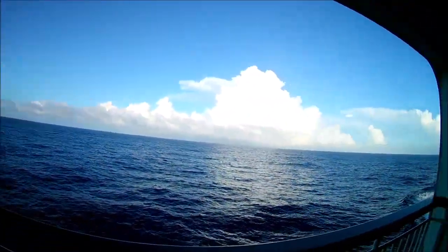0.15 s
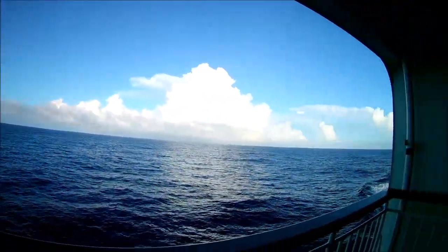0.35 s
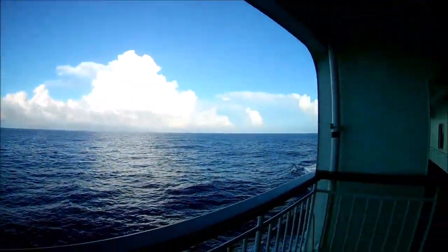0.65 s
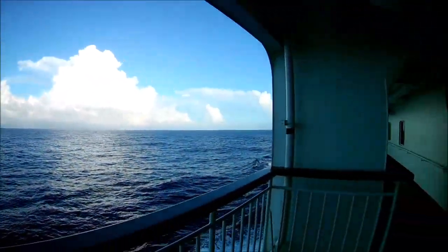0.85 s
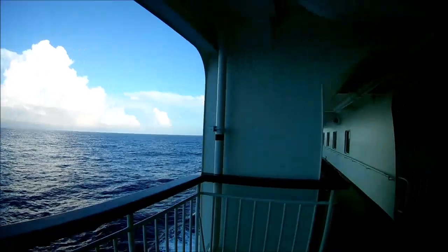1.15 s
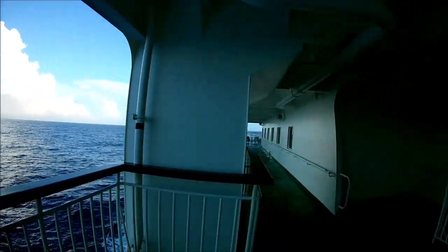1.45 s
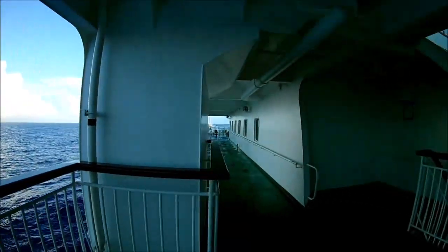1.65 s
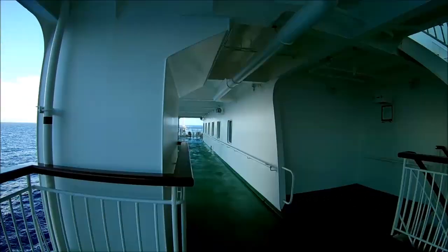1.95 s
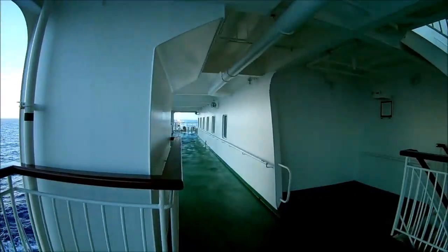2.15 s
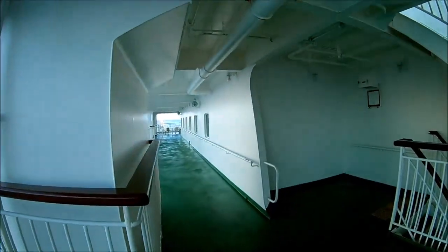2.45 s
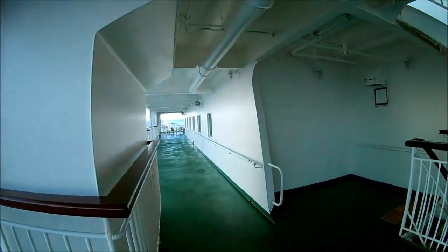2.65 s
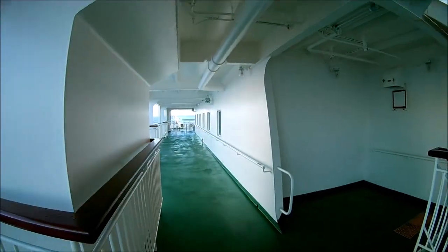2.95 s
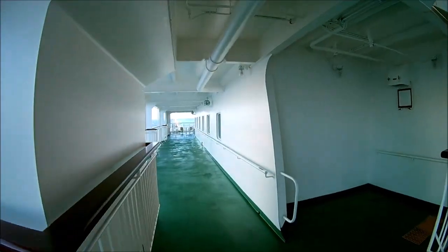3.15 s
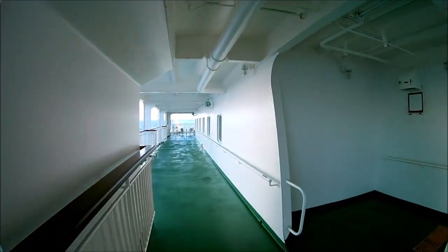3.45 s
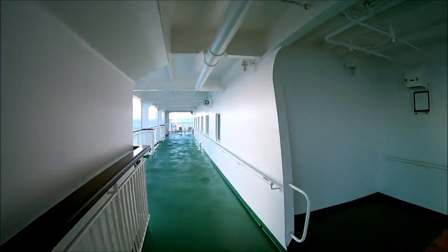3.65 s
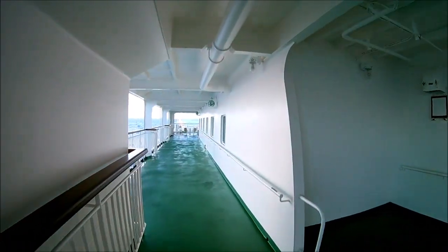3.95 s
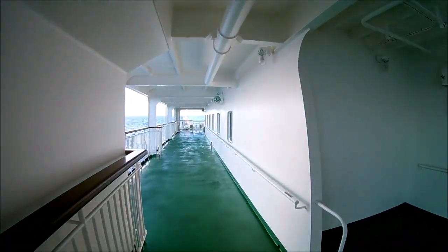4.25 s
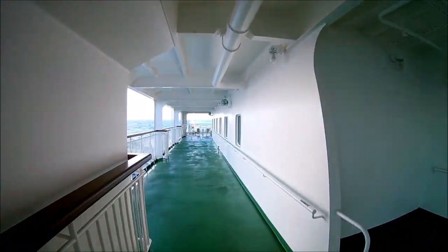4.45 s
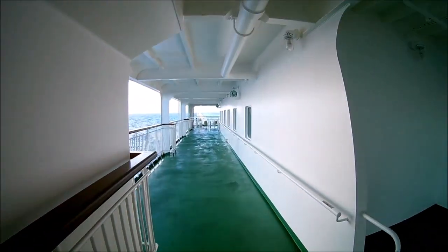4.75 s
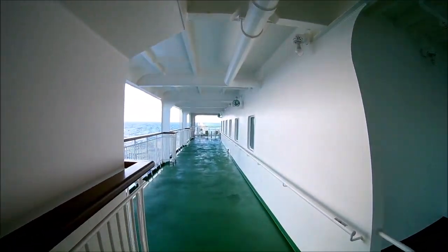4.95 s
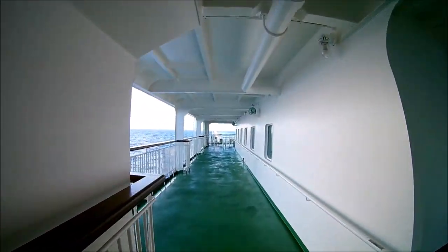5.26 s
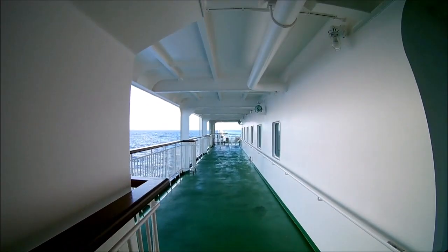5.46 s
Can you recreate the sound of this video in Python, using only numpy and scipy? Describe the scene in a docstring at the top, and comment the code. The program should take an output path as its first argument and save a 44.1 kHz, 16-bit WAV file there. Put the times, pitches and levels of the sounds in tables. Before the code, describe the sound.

A ship's engine drones low and throbbing on a covered deck while the sea hisses past and wind thumps the microphone.

```python
"""On the covered side deck of a ship under way, the main engine throbs through the steel: a set of steady tones.
Gusts buffet the microphone as low, lumpy noise, and bursting eddies thump it with short swings.
Machinery noise rings in the deck plates, and the ventilation hums on one wavering tone and hisses in one band.
The sea, a broad shaped noise, hisses along the hull and shifts in treble as the listener turns."""
import sys
import numpy as np
from scipy import signal
from scipy.io import wavfile
from scipy.ndimage import uniform_filter1d

SR = 44100
rng = np.random.default_rng(int(sys.argv[2]) if len(sys.argv) > 2 else 0)


def log_audio(samples):
    """Write samples as a 16-bit WAV file to the path given in sys.argv[1]."""
    # one column per channel
    frames = np.atleast_2d(samples).T
    # limit to full scale, then quantise
    limited = np.clip(frames, -1, 1)
    pcm = np.round(limited * 32767).astype(np.int16)
    wavfile.write(sys.argv[1], SR, pcm)


N = 247842  # length in samples
T = np.arange(N) / SR  # time of each sample in seconds


def amp(db):
    """Turns decibels into a gain."""
    return 10 ** (np.asarray(db) / 20)


def evened(x):
    """Scales a signal to an average strength (rms) of 1."""
    return x / np.sqrt(np.mean(x ** 2) + 1e-20)


def columns(rows, t):
    """Reads every column of a curve table at the times t, with straight lines between rows."""
    s, *values = np.transpose(rows)
    return [np.interp(t, s, v) for v in values]


def slow_noise(size):
    """Random wandering: noise averaged twice over a number of samples, at rms 1."""
    once = uniform_filter1d(rng.standard_normal(N), size=size)
    return evened(uniform_filter1d(once, size=size))


def resonate(x, hz, width):
    """A steep resonance: shifts the pitch hz down to zero, smooths twice, and shifts back."""
    turn = np.exp(2j * np.pi * np.cumsum(hz * np.ones(N)) / SR)
    r = np.exp(-np.pi * width / SR)  # width in Hz of one smoothing
    once = signal.lfilter([1], [1, -r], x / turn)
    twice = signal.lfilter([1], [1, -r], once)
    return (turn * twice).real


def shaped_noise(gain, size):
    """Noise built from random short-time spectra, each weighted by gain(Hz, seconds)."""
    frames = 4 * N // size + 5
    hz = np.fft.rfftfreq(size, 1 / SR)[:, None]
    t = np.arange(frames) * size / 4 / SR
    a, b = rng.standard_normal((frames, len(hz), 2)).T
    spectra = (a + 1j * b) * gain(hz, t) / size
    return signal.istft(spectra, nperseg=size, noverlap=3 * size // 4)[1][:N] * np.sqrt(size)


def engine():
    """Tones at whole multiples (orders) of the engine cycle; neighbouring orders beat once a cycle."""
    # Each row: multiple of the cycle, level in dB before the throb is added.
    orders = [(5, -50.5), (6, -48), (7, -29), (8, -39.5), (30, -39)]
    # The eighth order swells and fades, so the throb deepens and flattens; the thirtieth comes up in the passage.
    # Each row: time in seconds, change of the eighth order in dB, change of the thirtieth in dB.
    throb = [(0, 4, -5.5), (.8, 5, -7.5), (1.3, 6, -5), (1.7, 3, -0.5), (2.15, 6, 0.5), (2.6, 0, 6),
             (3.1, -2, 1), (3.8, -7.5, -9.5), (4.4, -2, -7), (5.62, 4, -4.5)]
    # Engine speed, drifting a little. Each row: time in seconds, cycles per second in Hz.
    cycle = [(0, 4.7), (1.3, 4.697), (2.4, 4.685), (3.2, 4.68), (4, 4.676), (5.62, 4.66)]
    first_throb_s = .051  # the orders line up at about this moment
    turns = np.cumsum(columns(cycle, T)[0]) / SR - cycle[0][1] * first_throb_s
    eighth_db, thirtieth_db = columns(throb, T)
    out = np.zeros(N)
    for k, db in orders:
        level_db = db + eighth_db * (k == 8) + thirtieth_db * (k == 30)
        out += np.sqrt(2) * amp(level_db) * np.cos(2 * np.pi * k * turns)
    return out


def thumps():
    """Eddies burst on the microphone: each is a brief swing with a faint rasp, rising faster than it settles."""
    # Each row: time in seconds, level of the swing in dB, basic length in ms, swing in Hz, push 1 or pull -1.
    eddies = [(.306, -19, 2.2, 120, 1), (0.309, -9, 3.4, 120, -1), (0.329, -10.5, 1.9, 130, 1),
              (0.495, -10.5, 1.8, 130, -1), (.57, -11.5, 3.9, 90, 1), (.578, -17, 4, 280, -1),
              (.604, -13, 4.9, 80, -1), (0.614, -7, 2.5, 230, 1), (.627, -7, 2.6, 90, -1),
              (0.635, -12, 4.9, 70, 1), (.639, -18, 2.3, 330, 1), (0.644, -9, 1.4, 89, -1),
              (.656, -10, 1.9, 170, -1), (0.662, -8.5, 2.5, 141, 1), (1.302, -14, 2.4, 180, -1),
              (1.306, -15.5, 4.7, 46, 1), (1.316, -20, 7, 30, -1), (1.33, -17, 4.8, 60, 1),
              (1.371, -16, 5.7, 60, -1), (1.378, -14.5, 2, 150, -1), (1.382, -11, 3.7, 90, 1),
              (1.385, -13.5, 2.5, 330, -1), (1.388, -15, 4.6, 60, 1), (1.399, -15.5, 4, 60, -1),
              (1.498, -20, 3.5, 70, -1), (1.591, -16.5, 3.1, 171, 1), (1.615, -21, 5, 60, -1),
              (1.624, -15, 3, 120, 1), (1.648, -20, 1.7, 200, -1), (2.833, -18, 2.1, 140, -1),
              (2.962, -13.5, 3, 170, -1), (3.082, -15, 3.5, 80, -1), (3.091, -17, 2.6, 100, 1),
              (3.369, -19, 3, 170, 1), (3.5, -13, 4, 80, 1), (3.514, -17, 6.1, 60, -1),
              (3.528, -16, 4.3, 90, 1), (3.786, -15, 3.6, 70, -1), (3.851, -10.5, 2.8, 216, -1),
              (3.864, -11.5, 1.2, 200, 1), (3.872, -7, 1.7, 170, -1), (3.888, -20, 1.4, 850, 1),
              (3.893, -15, 4.1, 280, 1), (3.9, -12, 1.9, 200, 1), (3.919, -10, 7.2, 60, 1),
              (3.925, -6, 1.6, 230, 1), (3.927, -7, 3.3, 150, -1), (3.929, -20.5, 2.3, 620, 1),
              (3.909, -12, 6.5, 50, -1), (3.94, -16, 4.4, 340, 1), (3.941, -11, 4.9, 45, -1),
              (3.954, -6, 2.1, 88, 1), (3.965, -4.5, 2.3, 98, -1), (3.992, -11.5, 2.2, 450, 1),
              (4.063, -6.5, 2.3, 130, 1), (4.066, -20.5, 1.5, 600, 1), (4.068, -6.5, 3.2, 109, -1),
              (4.082, -12, 3, 110, -1), (4.118, -14, 1.4, 200, -1), (4.121, -12.5, 5.6, 160, 1),
              (4.129, -16, 2.5, 160, 1), (4.142, -11, 3, 139, 1), (4.171, -13, 5, 100, -1),
              (4.179, -9.5, 2.8, 110, 1), (4.202, -3.5, 2.2, 120, 1), (4.204, -13, 2.6, 410, 1),
              (4.21, -14.5, 3, 520, -1), (4.212, -4, 2.9, 87, -1), (4.219, -14, 2.5, 90, 1),
              (4.445, -15, 4, 70, 1), (4.523, -16.5, 3, 180, -1), (4.736, -16, 3, 130, -1),
              (4.948, -22, 2.5, 150, -1), (5.122, -17.5, 5.7, 60, 1), (5.195, -17.5, 2.6, 150, -1),
              (5.437, -18, 2.2, 200, -1)]
    out = np.zeros(N)
    rasp = evened(resonate(resonate(rng.standard_normal(N), 550, 900), 550, 900))  # dark noise
    for s, db, ms, hz, push in eddies:
        t = T - s
        length = ms / 1000 * np.where(t < 0, .7, 1.2)  # shorter before the peak than after
        swing = np.sign(push) * np.cos(2 * np.pi * hz * t) + 0.078 * rasp
        out += amp(db) * np.exp(-(t / length) ** 2) * swing
    return out


def wind(t):
    """The breeze swells at random and gusts rise, hold and fall: gives the gain and the turbulence top in Hz."""
    # Gusts across the microphone.
    # Each row: start of the hold in seconds, hold in seconds, level in dB, top of the turbulence in Hz.
    gusts = [(0.286, 0.066, -24.5, 139.6), (0.547, 0.12, -25.5, 199), (0.752, 0.073, -26, 90.7),
             (1.294, .1, -27.5, 149), (1.584, .06, -29, 140), (2.14, 0.056, -31, 80),
             (3.069, 0.091, -29.5, 83.5), (3.507, .05, -26, 110.7), (3.838, .11, -22, 301),
             (3.977, .03, -24, 198), (4.05, .17, -22, 197), (4.397, .08, -28.5, 94.5),
             (4.7, 0.055, -30.5, 93.3), (5.109, 0.11, -29.5, 88.7), (5.253, .2, -30.5, 99.3)]
    rise_s, fall_s = 0.025, .025
    breeze_db, breeze_swell_db, breeze_hz = -41, 2.5, 80  # level, rms swell, top of the turbulence
    swell = np.zeros(len(t))
    for hz in np.geomspace(1.2, 9, num=24):
        swell += np.sin(2 * np.pi * (hz * t + rng.random())) / np.sqrt(hz)
    power = amp(breeze_db + breeze_swell_db * evened(swell)) ** 2
    weighted = power * breeze_hz
    for start, hold, db, top_hz in gusts:
        before = np.maximum((start - t) / rise_s, 0)
        after = np.maximum((t - start - hold) / fall_s, 0)
        gust = amp(db) ** 2 * np.exp(-(before + after) ** 2)
        power = power + gust
        weighted = weighted + gust * top_hz
    return np.sqrt(power), weighted / power  # the stronger wind decides the top


def buffeting():
    """Turbulence at the microphone: low noise in lumps, reaching higher in some gusts."""
    level, top_hz = wind(T)

    def gain(hz, t):
        shape = hz ** 2 / (hz ** 2 + 30 ** 2) ** 1.166  # weak at the very bottom
        shape = shape / (1 + (hz / np.interp(t, T, top_hz)) ** 1.78)  # falls away above the top
        shape = shape / (1 + (hz / 900) ** 4)
        return shape / np.linalg.norm(shape, axis=0)  # same strength at every moment
    lumps_db = 3. * slow_noise(350)
    return level * evened(shaped_noise(gain, size=2048) * amp(lumps_db))


def plates():
    """Machinery noise feeds resonances in the steel around the passage, so the plates ring."""
    # Each row: pitch at rest in Hz, width of one smoothing in Hz, level in dB before the boom is added,
    # boom column that it follows (0 lowest, 1 middle, 2 upper).
    rings = [(135.4, 17.4, -34, 0), (154.5, 12, -38.5, 1), (174.6, 12, -38, 1), (188.6, 15.2, -37, 1),
             (207.8, 17, -43.5, 1), (253.6, 12, -44, 2), (279.2, 16, -44.5, 2), (323.7, 17, -42, 2),
             (352.2, 12.8, -43.5, 2), (380.9, 14, -48.5, 2)]
    # The ringing drifts as the listener turns and walks.
    # Each row: time in seconds, change of the lowest plate in dB, of the middle ones in dB, of the upper ones in dB.
    boom = [(0, -13, -7, 2), (.5, -7, -4, 5.5), (1, 0, 6.5, 3.5), (1.5, -4, 1.5, -1), (2, 0, 5.5, -4.5),
            (2.5, 0.5, 3.5, -4), (3, 3, 2, -2), (3.6, -1.5, -3.5, 2), (4.3, 0.5, 1, 2.5), (5.1, 0, -6, 0.5),
            (5.62, 4.5, -5, 2.5)]
    # The lowest ring slides in pitch along the passage. Each row: time in seconds, ratio to its rest pitch.
    slides = [(0, 0.94), (1.5, 0.98), (2.0, 1.03), (2.7, 1.03), (3.3, 0.98), (4.1, 0.96), (5.1, 0.96),
              (5.62, 0.92)]
    slide, = columns(slides, T)
    boom_db = columns(boom, T)
    noise = rng.standard_normal(N)  # one noise feeds all the plates
    out = np.zeros(N)
    for hz, width, db, k in rings:
        k = round(k)
        pitch = hz * (slide if k == 0 else 1)
        out += amp(db + boom_db[k]) * evened(resonate(noise, pitch, width))
    return out


def fan():
    """The blade tone of the ventilation, whose speed and strength waver at random."""
    # Each row: time in seconds, level of the tone in dB before the wavering.
    tone_levels = [(0, -32.5), (.45, -29.5), (.9, -36.5), (1.3, -35.5), (1.55, -38.5), (1.8, -32),
                   (2.1, -42), (2.5, -35.5), (2.9, -34), (3.3, -38), (3.7, -29.5), (4.2, -44), (4.55, -32),
                   (4.9, -37.5), (5.2, -41), (5.62, -34)]
    fan_hz, wander_hz, wander_db = 161.2, .8, 2.5  # the wanders are rms
    waver = slow_noise(6000)
    level_db = columns(tone_levels, T)[0] + wander_db * np.roll(waver, N // 2)  # strength wavers apart from speed
    turns = np.cumsum(fan_hz + wander_hz * waver) / SR
    return np.sqrt(2) * amp(level_db) * np.cos(2 * np.pi * turns)


def sea():
    """Broad hiss of the bow wave: noise with a fixed colour whose level and treble follow the turning listener."""
    # Colour of the hiss. Each row: pitch in Hz, relative level per Hz in dB.
    colours = [(15, -9), (45, 1.5), (70, -7), (95, -11.5), (150, -5), (220, -6), (420, -7.5), (600, -9.5),
               (1100, -12.5), (1800, -18.5), (2200, -23), (2500, -28.5), (2800, -31.5), (5000, -42),
               (7000, -52), (9000, -60.5), (12500, -72), (16000, -70.5)]
    # Each row: time in seconds, wash in dB (only its rise and fall count), tilt in dB per octave from 500 to 7000 Hz.
    wash = [(0, -40.5, 0.4), (.58, -32.5, -0.06), (.83, -35, -0.5), (1.24, -34, -0.5), (1.9, -37, 0),
            (2.2, -37.5, -0.5), (2.45, -37.5, -0.8), (2.53, -38, 0.25), (2.7, -38.5, -0.5),
            (3.35, -38.5, -1.33), (3.78, -39, -1.3), (3.86, -39, -1), (3.95, -36, -2.5), (4.1, -37, -2.1),
            (4.4, -38.5, -1.5), (4.9, -38, -1.84), (5.12, -37, -1.4), (5.3, -38, -0.8), (5.62, -38.5, 0)]

    def gain(hz, t):
        wash_db, bright_db = columns(wash, t)
        facing = np.clip(np.log2((hz + 1) / 200) / 2, 0, 1)  # the bass fills the deck whichever way one faces
        colour_hz, colour_level = np.transpose(colours)
        colour_db = np.interp(np.log(hz + 1), np.log(colour_hz + 1), colour_level)
        patches = rng.standard_normal((len(t), len(hz))).T
        patches = uniform_filter1d(patches, size=12, axis=0)  # smooth over pitch, then over time
        patches_db = 1.0 * evened(uniform_filter1d(patches, size=10, axis=1))
        octaves = np.log2(np.clip(hz, 500, 7000) / 500)
        level_db = facing * (wash_db - wash_db.mean()) + bright_db * octaves
        return amp(colour_db + level_db + patches_db)
    return amp(-28) * evened(shaped_noise(gain, size=1024))


def vent():
    """Air hisses through the ventilation grille: a band of noise, fluttering a little."""
    vent_hz, width_hz, vent_db = 3980, 850, -71.5  # centre, width of one smoothing, level before the flutter
    flutter_db = 1.6 * slow_noise(2500)
    band = resonate(rng.standard_normal(N), vent_hz, width_hz)
    band = resonate(band, vent_hz, width_hz)
    return amp(vent_db + flutter_db) * evened(band)


def scene():
    """All sources at one microphone."""
    return (engine() + thumps() + buffeting() + plates() + fan() + sea() + vent())[None]


def record(dry):
    """The capsule rounds off hard blows, the housing colours the sound, then come faint hiss and a band limit."""
    # Hollows and humps of the housing. Each row: centre in Hz, distance to 1/e of the depth in Hz, level in dB.
    housing = [(3330, 436, -7), (3830, 500, 4), (4800, 300, 2), (5470, 250, -0.5), (7910, 480, -13.5)]
    overload, edge_hz = .8, 15740  # largest swing of the capsule (full scale 1), upper band limit
    hz = np.linspace(0, SR / 2, 513)
    colour_db = sum(db * np.exp(-((hz - f) / width) ** 2) for f, width, db in housing)
    rounded = overload * np.tanh(dry / overload)
    # extra sound at both ends gives the two filters room
    longer = np.pad(rounded, ((0, 0), (510, 510)), "reflect", reflect_type="odd")
    colour = signal.firwin2(511, hz, amp(colour_db), fs=SR)[None]
    wet = signal.oaconvolve(longer, colour, "valid")
    hiss = signal.lfilter([1, -.5], [1], rng.standard_normal(wet.shape))  # leans to the treble
    wet = wet + amp(-81.0) * hiss
    band_limit = signal.firwin(511, edge_hz, window=("kaiser", 9), fs=SR)[None]
    return signal.oaconvolve(wet, band_limit, "valid")


dry = scene()
out = record(dry)
log_audio(out)
```